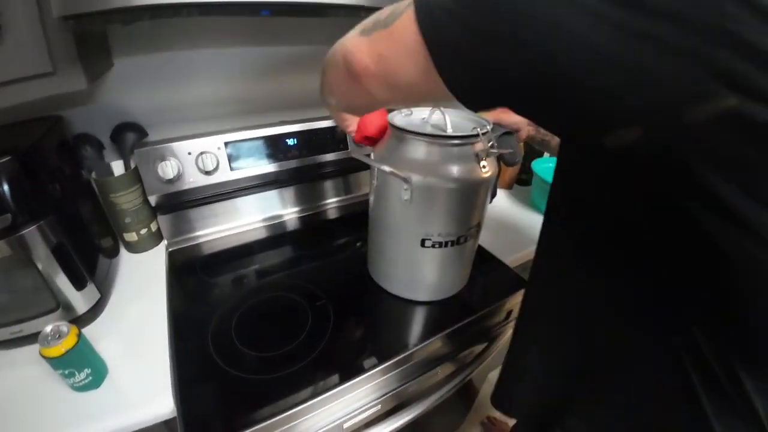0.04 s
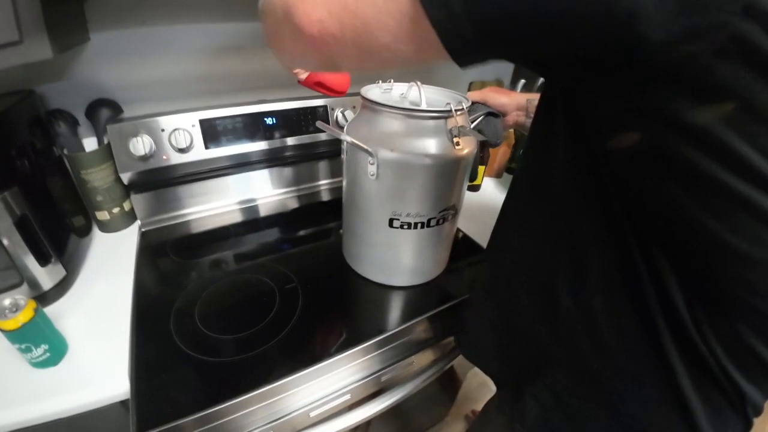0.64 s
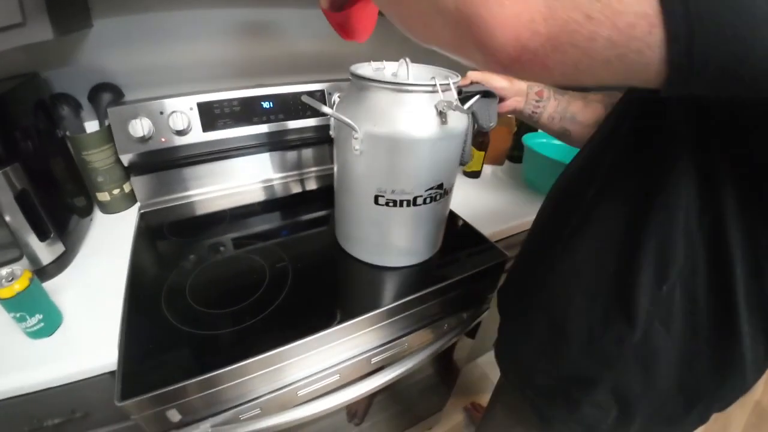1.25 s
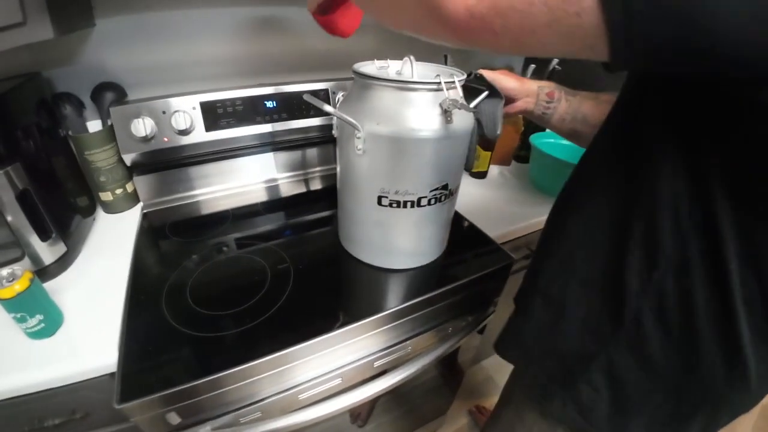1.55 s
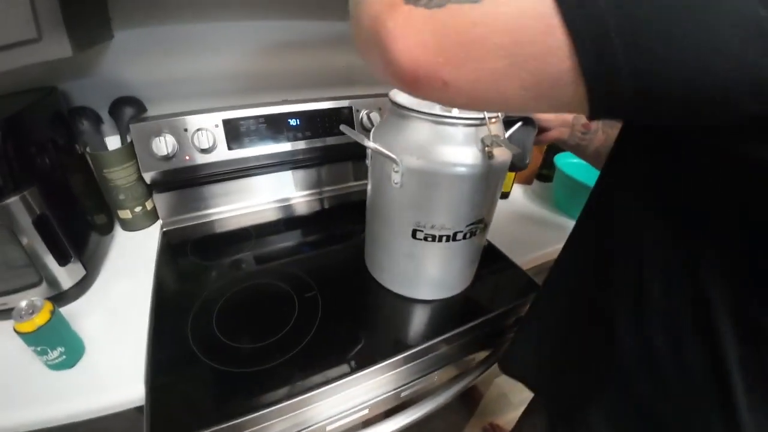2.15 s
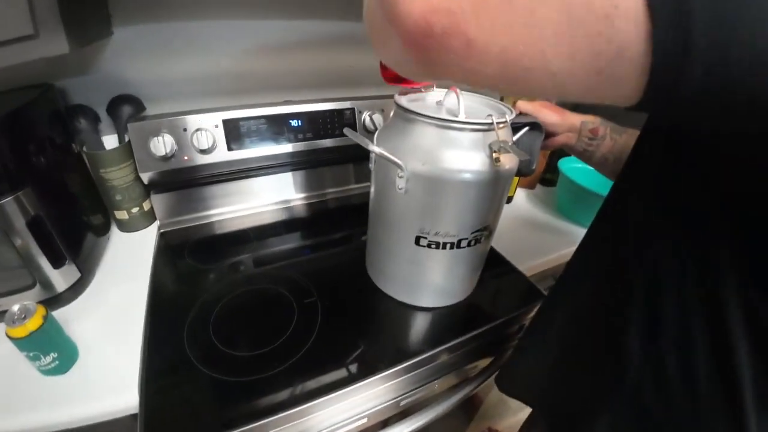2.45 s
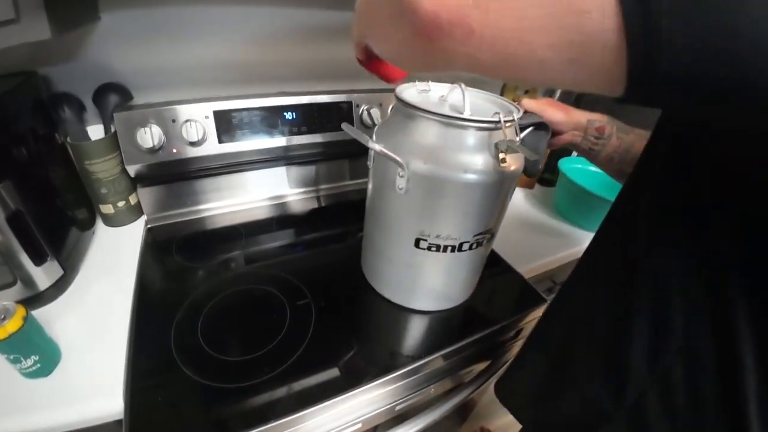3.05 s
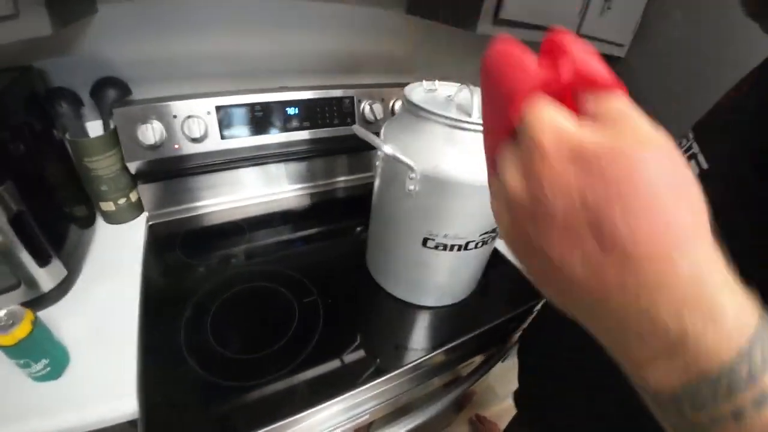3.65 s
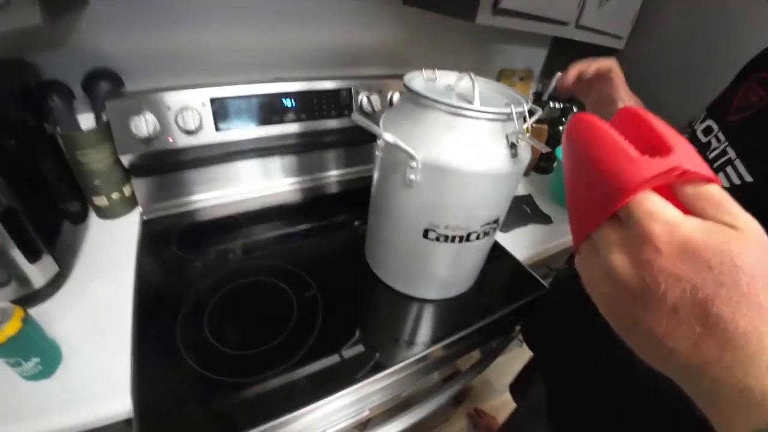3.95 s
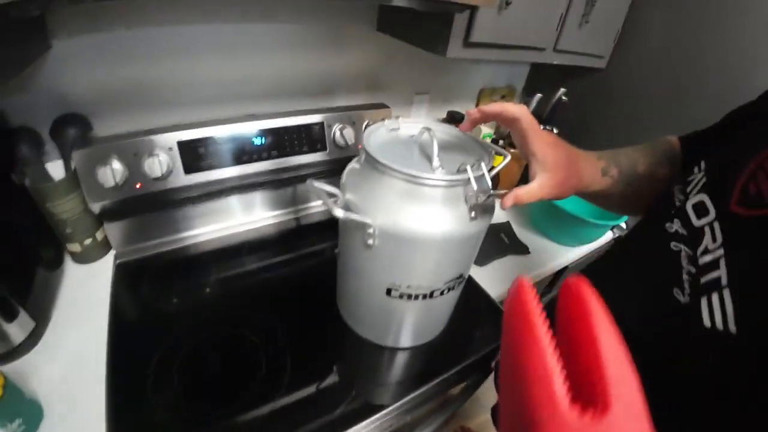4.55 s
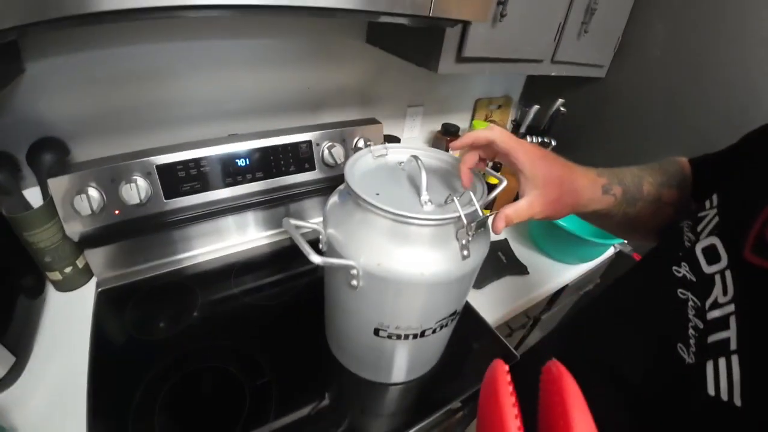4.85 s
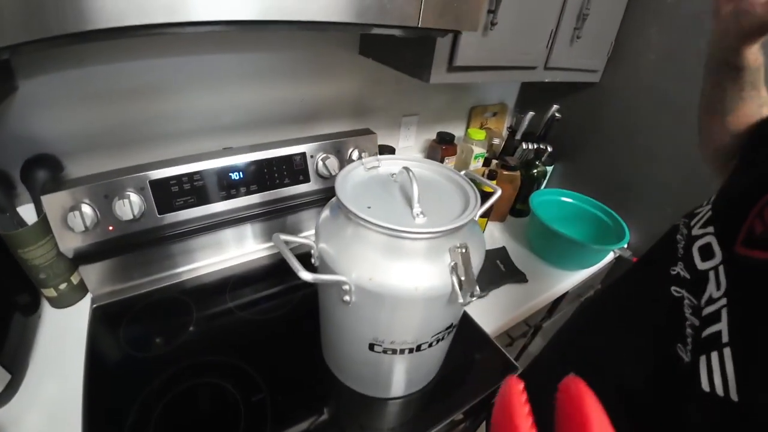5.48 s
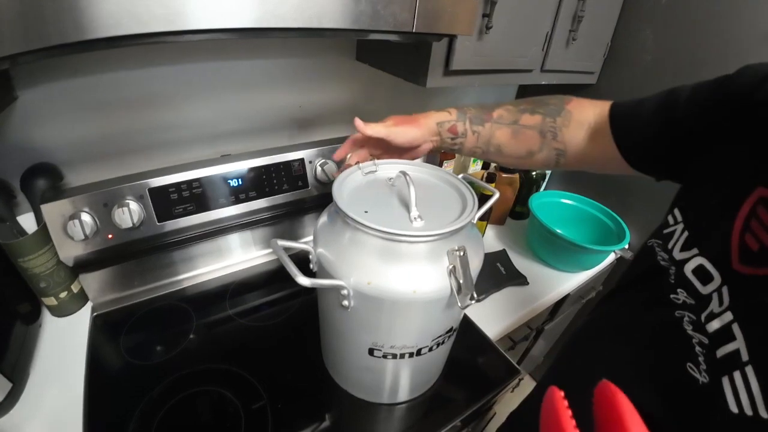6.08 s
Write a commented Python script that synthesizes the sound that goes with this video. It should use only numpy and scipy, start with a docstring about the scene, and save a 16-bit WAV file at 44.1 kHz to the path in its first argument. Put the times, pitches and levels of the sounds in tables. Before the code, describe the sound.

A low appliance hum and soft room tone fill a small kitchen, heard from close to an aluminium steam pot. After a light bump at the start, a wire latch scrapes over the rim and snaps sharply around 0.4 and 0.7 seconds, chattering and briefly ringing the pot. Another hard snap comes at 2 seconds, and a gritty scrape with more snaps around 2.7. A sleeve rumbles softly near the microphone between about 1 and 4.5 seconds. At 3.7 and 3.8 seconds something is put down with two dull, hollow knocks. Lighter clicks ring on the loosened lid around 4.4 and 5.1 seconds. From 5.2 to 5.9 the freed latch jingles and slaps the pot wall in quick, bright clanks that die away, the sharpest giving the microphone a low thump. A very faint, airy whistle starts at about 6 seconds.

```python
"""Sharp metal snaps and a ringing aluminium steam pot: its wire latches are opened in a small kitchen.
The wires scrape over the rim and spring off; each blow chatters briefly and rings the pot.
Midway something is put down with two dull knocks; later a freed latch jingles and slaps the pot wall.
The sharpest blows push the microphone, and a sleeve moves close to it over a low appliance hum.
A faint whistle starts at the end."""
import sys
import numpy as np
from scipy import signal
from scipy.fft import rfft, irfft
from scipy.io import wavfile
from scipy.ndimage import uniform_filter1d

SR = 44100
rng = np.random.default_rng(int(sys.argv[2]) if len(sys.argv) > 2 else 0)


def wav_record(signal):
    """Record a signal, one row per channel, as 16-bit PCM in the file named by sys.argv[1]."""
    frames = np.transpose(np.atleast_2d(signal))
    bounded = np.clip(frames, -1, 1)
    # unit amplitude maps onto the largest positive 16-bit level
    quanta = np.round(bounded * 32767).astype(np.int16)
    wavfile.write(sys.argv[1], SR, quanta)


N = 278712

# tone colour of steel wire on the rim: (frequency [Hz], gain [dB])
RIM_COLOUR = [(60, -7.5), (110, -5), (190, 1.5), (350, -2.5), (450, -4.5), (800, -2), (1050, 1.5),
              (2300, 1.5), (4200, -1), (5300, 1), (7000, 0), (11300, -2.5), (12800, -13), (15400, -10)]


def amp(db):
    """Decibels to gain."""
    return 10 ** (np.asarray(db) / 20)


def unit_rms(x):
    """Scales to rms 1."""
    return x / np.sqrt(np.mean(x ** 2) + 1e-20)


def curve_at(points, hz):
    """Reads a curve on a log-frequency axis."""
    f, value = np.transpose(points)
    return np.interp(np.log(hz + 1), np.log(f + 1), value)


def add(mix, s, sound):
    """Adds a sound into the mix at s seconds."""
    part = mix[..., max(0, round(s * SR)):][..., :sound.shape[-1]]
    part += sound[..., :part.shape[-1]]


def colour(x, points, size=4096):
    """Minimum-phase EQ through (frequency [Hz], gain [dB]) points, so that attacks stay sharp."""
    log_gain = np.log(amp(curve_at(points, abs(np.fft.fftfreq(size, 1 / SR)))))
    taps = np.fft.ifft(np.exp(np.conj(signal.hilbert(log_gain)))).real[:size // 2]
    return signal.oaconvolve(x, taps[None], axes=1)[:, :x.shape[1]]


def resonance(x, hz, width_hz, db):
    """Adds a resonant band; the narrower it is, the longer it rings."""
    return x + amp(db) * signal.lfilter(*signal.iirpeak(hz, max(hz / width_hz, 1), fs=SR), x)


def stereo(pair, width):
    """Two unrelated signals, as mid and side, become left and right."""
    side = colour(pair[1:], width)[0]
    return np.array([pair[0] + side, pair[0] - side])


def swells(rows, rest_db, range_db=20):
    """Envelope over a resting level: each swell gains range_db in its rise and loses it in its fall."""
    t = np.arange(N) / SR
    power = sum(amp(db - range_db * np.maximum((s - t) / rise, (t - s) / fall)) ** 2
                for s, db, rise, fall in rows)
    return np.sqrt(power + amp(rest_db) ** 2)


def chatter(length, size=8192):
    """A chattering contact: a spiky, fast-dying burst with an even spectrum."""
    t = np.arange(size) / SR
    envelope = (1 - np.exp(-t / 0.002)) * np.exp(-t / max(length, .001))
    spikes = rng.standard_normal((2, size)) * amp(3 * rng.standard_normal(size)) * envelope
    whitened = irfft(np.exp(1j * np.angle(rfft(spikes))))
    burst = whitened * np.sqrt(envelope)
    return burst / np.linalg.norm(burst, axis=1, keepdims=True) * np.sqrt(length * SR / 2)


def ring(x, modes, ring_db, detune, uneven_db):
    """A body adds its dying modes, whose pitch and strength shift with grip and striking spot."""
    t = np.arange(min(x.shape[1], SR // 2)) / SR
    scatter = np.clip(rng.standard_normal((len(modes), 2)), -1.5, 1.5)
    tone = np.zeros(len(t))
    for (hz, db, t60), (louder, sharper) in zip(modes, scatter):
        decay = amp(db + uneven_db * louder - 60 * t / t60) / np.sqrt(t60 * SR)
        tone += decay * np.sin(2 * np.pi * hz * (1 + detune * sharper) * t)
    return x + amp(ring_db) * signal.oaconvolve(x, tone[None], axes=1)[:, :x.shape[1]]


def kitchen(x, early_db, early_s, tail_db):
    """Quick reflections from stove and wall, then a tail in which each band dies at its own speed."""
    # reverb decay: (frequency [Hz], t60 [s])
    decay_times = [(150, 0.59), (400, 0.45), (1040, 0.48), (2760, 0.54), (6000, 0.42), (11000, 0.33),
                   (15000, 0.1)]
    t = np.arange(SR) / SR
    early, late = rng.choice([-1., 1.], (2, 2, SR)) * (rng.random((2, 2, SR)) < .15)  # sparse echoes
    early = early * np.exp(-t / early_s) * (t > .002)
    hz, when, bands = signal.stft(late * (1 - np.exp(-t / 0.0051)), SR, nperseg=256)
    decay = amp(-60 * when / curve_at(decay_times, hz)[:, None])
    tail = signal.istft(bands * decay, SR, nperseg=256)[1][:, :SR]
    echoes = (amp(early_db) * unit_rms(early) + amp(tail_db) * unit_rms(tail)) / np.sqrt(SR)
    return x + signal.fftconvolve(x, echoes, axes=1)[:, :N]


def room_air(level_db=-53):
    """A steady, dark bed of room tone."""
    # colour of the air: (frequency [Hz], gain [dB])
    air_colour = [(12, -16), (20, 11.5), (68, -18), (154, -15.5), (241, -12.5), (319, -20.5), (388, -17.5),
                  (738, -26), (825, -27), (1760, -34.5), (2820, -35.5), (3340, -35.5), (11100, -55),
                  (16000, -58)]
    # its stereo width: (frequency [Hz], side minus mid [dB])
    air_width = [(30, 7), (80, 7), (170, -20.5), (500, -12.5), (2000, -11), (8000, 4)]
    air = unit_rms(colour(rng.standard_normal((2, N)), air_colour))
    return stereo(amp(level_db) * air, air_width)


def appliance_hum(waver_hz=1.5):
    """An appliance hums in low partials, each wavering in pitch."""
    # hum partials: (frequency [Hz], rms level [dB])
    partials = [(60, -58), (188.4, -62.5), (242.2, -69)]
    drifts = unit_rms(uniform_filter1d(rng.standard_normal((len(partials), N)), size=4000, axis=1))
    return sum(amp(db) * np.sqrt(2) * np.sin(2 * np.pi * np.cumsum(hz + waver_hz * drift) / SR)
               for (hz, db), drift in zip(partials, drifts))


def sleeve(gain_db=-4.5):
    """A sleeve stirs the air at each microphone port separately: a soft, swelling rumble."""
    # arm movements: (peak time [s], level [dB], rise and fall time [s])
    swishes = [(1.155, -37.5, 0.26), (1.67, -38.5, 0.2), (3.26, -31, 0.096), (3.504, -40, 0.6),
               (3.897, -37.5, 0.21), (4.5, -39, 0.29)]
    # colour of the cloth: (frequency [Hz], gain [dB])
    cloth_colour = [(20, 10.5), (65, 5), (130, -8), (200, -11), (350, -29), (900, -38.5), (4000, -66.5),
                    (16000, -68)]
    # its stereo width: (frequency [Hz], side minus mid [dB])
    cloth_width = [(30, 9), (100, 7), (250, -3), (900, -7)]
    motion = swells([(s, db, length, length) for s, db, length in swishes], rest_db=-56)
    rumble = unit_rms(colour(rng.standard_normal((2, N)), cloth_colour))
    return stereo(amp(gain_db) * motion * rumble, cloth_width)


def blow(db, length, clank_db, thud_db, wire_db):
    """One contact clinks the latch's lever and wire; a harder blow is brighter."""
    # short modes of the steel lever and wire: (frequency [Hz], level [dB], t60 [s])
    lever_modes = [(1130, 1, .07), (1260, 0, .05), (1600, -2, .04), (1850, -1, .04), (2030, 0, .04),
                   (2360, 0, .04), (2740, -2, .03), (3050, -1, .025), (3550, -2, .025), (4900, 1, .022),
                   (5500, 2, .018), (6250, 0, .015), (7050, 1, .018), (8100, 0, .012), (9900, 0, .015),
                   (11200, 2, .015)]
    hardness = [(400, thud_db + 0.64 * db), (950, clank_db + 0.67 * db),
                (2500, clank_db + 1 + 0.82 * db), (5000, db)]
    clink = ring(chatter(length), lever_modes, ring_db=-5, detune=.025, uneven_db=3)
    wire_hz = 5600 * (1 + rng.uniform(-.07, .07))
    return colour(resonance(clink, wire_hz, width_hz=400, db=wire_db), hardness)


def pot(hits, body_colour, pot_db, spot_count=3):
    """Hits (time [s], sound) land in turn on several spots and ring the pot; one signal a spot."""
    # ringing of pot and latch: (frequency [Hz], level [dB], t60 [s])
    pot_modes = [(950, -6, .3), (1028, -5, .3), (1060, -6, .35), (1125, -3, .6), (1270, -4, .35),
                 (1577, -5, .24), (1690, -5, .4), (1775, -3, .3), (2003, 0, .55), (2340, -6, .35),
                 (2464, -5, .25), (2713, -5, .31), (2977, -4, .2), (3427, -4, .2), (4764, -5, .2),
                 (4890, 0, .25), (5200, -2, .3), (5460, -3, .22), (5702, -4, .12), (6320, -3, .18),
                 (7090, -4, .08), (9114, -7, .1), (11152, -3, .12)]
    spots = np.zeros((spot_count, 2, N))
    for k, (s, sound) in enumerate(hits):
        add(spots[k % spot_count], s, colour(sound, body_colour))
    return [ring(force, pot_modes, ring_db=pot_db, detune=.002, uneven_db=1.5) for force in spots]


def latch_snaps(gain_db=-2, loose_from_s=3):
    """The sprung wires snap off the rim and rattle on the lid, which rings longer once it is loose."""
    # wire on rim and lid: (time [s], strength [dB], mid clank [dB], bass weight [dB], chatter time [s])
    snaps = [(0.025, -52.5, 9, 10, 0.001), (0.08, -43, 9.5, 11, 0.0034), (0.251, -74.5, 15, -1.5, .0055),
             (0.4344, -12.5, -1, -5, 0.0042), (0.4392, -4.5, -0.5, -0.5, 0.0077),
             (0.4598, -4.5, 1, -1, 0.0055), (0.4698, -7, 8, 3.5, 0.002), (0.484, -13, 1, 12, .009),
             (0.518, -19, -15, 6, 0.004), (0.5673, -15, -4, 0, 0.0022), (0.5914, -38.5, 8.5, -6, 0.0033),
             (0.708, -8.5, 0.5, 8, 0.0057), (0.726, -14.5, 0, -13, 0.0028), (0.792, -20.5, -3.5, -2, 0.011),
             (1.22, -48, -9.5, -14, 0.0028), (1.8396, -43.5, 3, 4.5, 0.0076), (1.865, -53.5, 17, 9.5, .003),
             (1.8854, -39.5, -4.5, -2.5, .0056), (1.9699, -3.5, -1.5, -12, 0.0079),
             (1.9939, -7, 4, -2.5, 0.0031), (2.441, -49, -5, -6.5, .003), (2.4557, -31, -3.5, 0, 0.0022),
             (2.4725, -40, -3, 3, 0.0046), (2.6308, -26, 1.5, 0.5, 0.0032), (2.651, -5.5, 0.5, 5.5, 0.0058),
             (2.6861, -16.5, -2.5, 1, 0.0063), (2.7274, -15.5, 1, 4, 0.0046), (2.775, -37, -1, 19, 0.004),
             (2.96, -53.5, 6.5, -5, 0.0035), (4.3778, -31, 0.5, -2.5, 0.0036),
             (4.487, -41.5, 0.5, -12, 0.017), (4.9586, -41, -0.5, -10, 0.0025),
             (5.0575, -28, -11, 1.5, 0.0035), (5.065, -25.5, 8, -8, 0.0017)]
    clamped_lid = dict(hz=1025, width_hz=47, db=-1)
    loose_lid = dict(hz=1130, width_hz=4.4, db=15.6)
    hits = []
    for s, db, clank, weight, length in snaps + rattles():
        clink = blow(db, length, clank_db=clank - 9, thud_db=weight - 8, wire_db=0.5)
        lid = loose_lid if s > loose_from_s else clamped_lid
        hits.append((s, amp(gain_db) * resonance(clink, **lid)))
    spots = pot(hits, RIM_COLOUR, pot_db=-21.5)
    return sum(kitchen(spot, early_db=-3, early_s=0.0099, tail_db=-7) for spot in spots)


def knocks(boom_hz=149.8, hollow_q=9.5):
    """A dull bump at the start; midway something lands on the counter and settles with a hollow knock."""
    # contacts: (time [s], level [dB], chatter time [s], brightness [dB], hollow pitch [Hz])
    contacts = [(0.039, -28.5, .014, -21.5, 331.5), (3.668, -35, 0.012, 3, 1383),
                (3.678, -31, 0.0062, 2, 1400), (3.686, -13, 0.0048, 0, 1410), (3.694, -8.5, 0.0059, 5, 902),
                (3.712, -23, 0.026, -8, 1390), (3.830, -9.5, 0.0057, -4.5, 510)]
    # colour of a knock on the counter: (frequency [Hz], gain [dB])
    counter_colour = [(40, -1.5), (140, -4.5), (230, -2), (520, 0.5), (750, 0.5), (950, -2), (1500, 2),
                      (2600, -2), (4300, -13.5), (5800, -12.5), (9000, -26), (15000, -33.5)]
    # ringing of the knocked things: (frequency [Hz], level [dB], t60 [s])
    knock_modes = [(152, 5.5, 0.17), (298, 3, 0.12), (375.7, -9.5, 0.27), (436.7, 0, .35), (533, -5, 0.25),
                   (603, -8.5, 0.12), (687, -12, 0.24), (865, -7, .35), (1170, -8, 0.43), (1403, 6.5, 0.17),
                   (1790, -3.5, 0.26), (1770, 0.5, 0.18), (2380, -2, 0.41), (2600, -2, 0.29)]
    force = np.zeros((2, N))
    for s, db, length, bright, hollow_hz in contacts:
        weight = 0.5 - 0.046 * bright  # a duller knock is a heavier one
        tilt = [(150, weight), (520, 0.54 * weight), (1000, bright / 2), (3000, bright)]
        bump = amp(db) * colour(chatter(length), tilt)
        boom = resonance(bump, boom_hz, width_hz=35, db=5)
        add(force, s, resonance(boom, hollow_hz, width_hz=hollow_hz / hollow_q, db=8))
    body = ring(colour(force, counter_colour), knock_modes, ring_db=-16.5, detune=.002, uneven_db=1)
    return kitchen(body, early_db=-1, early_s=0.032, tail_db=-7)


def metal_grit(gain_db=-2):
    """Gritty swells of metal noise: wire scraping the rim, later the freed latch jingling between slaps."""
    # swells of grit: (peak time [s], level [dB], rise [s], fall [s])
    grit_swells = [(.06, -57.5, .04, .08), (.43, -41, 0.019, 0.11), (.70, -40, 0.08, 0.31),
                   (1.58, -60.5, .03, .2), (1.965, -40, 0.1, .04), (2.665, -29, 0.051, .1),
                   (4.3, -60.5, 0.056, 0.073), (5.062, -41.5, 0.018, 0.03), (5.48, -32, 0.16, 0.17)]
    envelope = swells(grit_swells, rest_db=-71)  # between swells the hands rub faintly on the pot
    grit = unit_rms(rng.standard_normal((2, N)) * amp(1.7 * rng.standard_normal(N)))
    metal = colour(amp(gain_db) * envelope * grit, RIM_COLOUR)
    groan = resonance(metal, 1027, width_hz=570, db=8.5)  # the lid's broad resonance
    return kitchen(groan, early_db=-8.5, early_s=0.014, tail_db=-7)


def microphone_pushes(bass_cut_hz=7, flutter_db=-15, flutter_s=.045):
    """A one-sided push swings back slowly through the microphone's bass cut; air flutters at each port."""
    # pushes from sharp blows: (time [s], level [dB], push length [s])
    pushes = [(0.441, -29, 0.011), (0.693, -45, 0.0074), (1.968, -28.5, 0.0054), (5.317, -14, .005),
              (5.367, -19.5, 0.013), (5.522, -23.5, 0.0088)]
    # colour of the flutter: (frequency [Hz], gain [dB])
    flutter_colour = [(30, -0.5), (130, -3), (230, -5), (600, -22), (2000, -62)]
    t = np.arange(SR // 4) / SR
    pressure = np.zeros((2, N))
    for s, db, length in pushes:
        pulse = t / length * np.exp(1 - t / length)
        envelope = (1 - np.exp(-t / length)) * np.exp(-t / flutter_s)
        flutter = envelope * unit_rms(colour(rng.standard_normal((2, len(t))), flutter_colour))
        add(pressure, s, amp(db) * (pulse + amp(flutter_db) * flutter))
    return signal.sosfilt(signal.butter(2, bass_cut_hz, "highpass", fs=SR, output="sos"), pressure)


def rattles(ticks=4, fade_db=-13, uneven_db=2, chatter_s=0.0023):
    """A loose wire rattles on in uneven, fading ticks; returns extra rows for latch_snaps."""
    # spells of rattling: (start [s], length [s], starting strength [dB])
    spells = [(0.53, .08, -39), (0.806, .05, -27), (4.491, .28, -45)]
    rows = []
    for start, length, db in spells:
        delays, accents = rng.random((ticks, 2)).T
        progress = (np.arange(ticks) + delays) / ticks
        rows += [(start + length * p, db + fade_db * p + uneven_db * (2 * accent - 1), 0, 0, chatter_s)
                 for p, accent in zip(progress, accents)]
    return rows


def latch_bounces(gain_db=-1):
    """The freed latch swings and slaps the pot wall, close to the microphone."""
    # slaps: (time [s], strength [dB], mid clank [dB], chatter time [s], pitch of the struck spot [Hz])
    slaps = [(5.226, -15.5, -3.5, 0.004, 1143), (5.2784, -16.5, -3.5, 0.0022, 1880),
             (5.317, -4.5, -1, 0.0032, 2856), (5.374, -6.5, -2.5, .0034, 1037),
             (5.4311, -14.5, -4.5, 0.0072, 3270), (5.531, -5, -0.5, 0.0021, 2067),
             (5.6187, -10, -5.5, 0.0051, 1770), (5.6396, -9, -5.5, 0.0022, 1690),
             (5.7615, -20, -6, 0.0055, 2104), (5.914, -35, -9.5, 0.003, 1144)]
    # colour of a blow on the pot wall: (frequency [Hz], gain [dB])
    wall_colour = [(60, -24), (190, -10), (360, -3.5), (470, -13), (700, -1), (1100, 0.5), (2000, 3.5),
                   (3200, 3), (4500, -2), (6000, -1.5), (8500, -3.5), (11400, -0.5), (13500, -14),
                   (15500, -9)]
    hits = []
    for s, db, clank, length, spot_hz in slaps:
        clink = blow(db, length, clank_db=clank - 9.5, thud_db=-10.5, wire_db=-9)
        hits.append((s, amp(gain_db) * resonance(clink, spot_hz, width_hz=45, db=14)))
    spots = pot(hits, wall_colour, pot_db=-19)
    return sum(kitchen(spot, early_db=0, early_s=0.011, tail_db=-8.5) for spot in spots)


def whistle(start_s=5.97, rise_s=0.046):
    """Air sings softly in two narrow bands, perhaps steam at the loosened lid."""
    # whistle bands: (frequency [Hz], filter width [Hz], level [dB])
    bands = [(2750, 220, -71.5), (2000, 130, -71.5)]
    fade_in = np.clip((np.arange(N) / SR - start_s) / rise_s, 0, 1)
    tone = np.zeros((2, N))
    for hz, width_hz, db in bands:
        peak = signal.iirpeak(hz, hz / width_hz, fs=SR)
        breath = signal.lfilter(*peak, rng.standard_normal((2, N)))
        tone += amp(db) * unit_rms(signal.lfilter(*peak, breath))
    return fade_in * tone


def scene():
    """Pot and counter in front of the two microphone ports, over air, sleeve and hum."""
    # how unlike the two ports are: (frequency [Hz], side minus mid [dB])
    port_width = [(100, -20.5), (400, -26), (1200, -29.5), (2800, -18), (5500, -6.5), (9000, -3.5),
                  (15000, -1)]
    action = latch_snaps() + latch_bounces() + metal_grit() + knocks() + whistle()
    return stereo(action, port_width) + microphone_pushes() + room_air() + sleeve() + appliance_hum()


def record(dry, ceiling=.85, cutoff_hz=16000):
    """Soft clipping rounds off the peaks, then a low-pass trims the top end."""
    rounded = ceiling * np.tanh(dry / ceiling)
    lowpass = signal.firwin(255, cutoff_hz, window=("kaiser", 8), fs=SR)
    return signal.oaconvolve(rounded, lowpass[None], "same")


dry = scene()
out = record(dry)
wav_record(out)
```